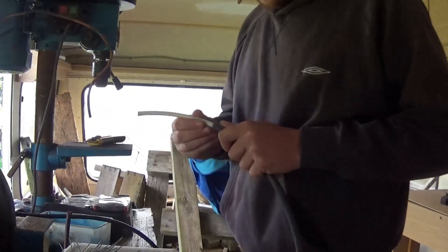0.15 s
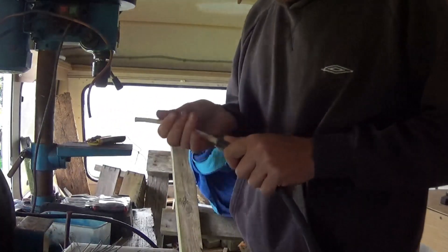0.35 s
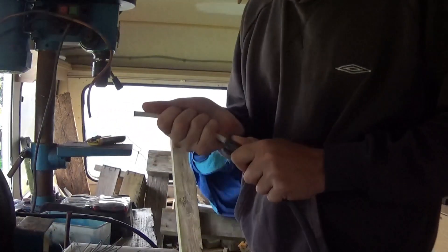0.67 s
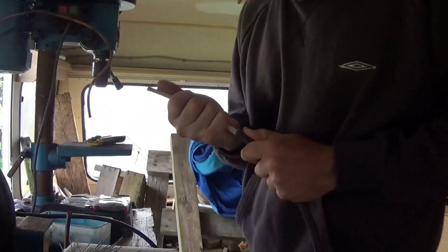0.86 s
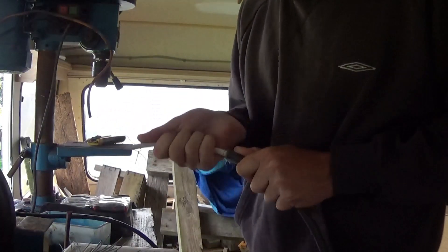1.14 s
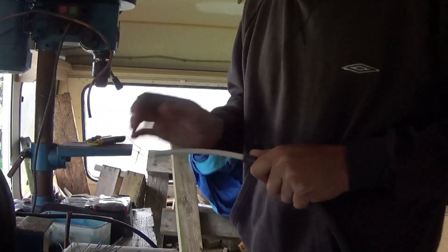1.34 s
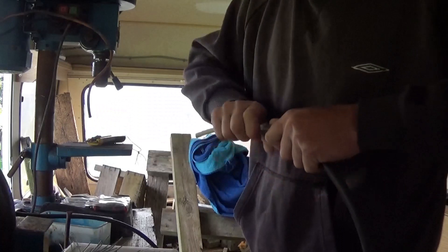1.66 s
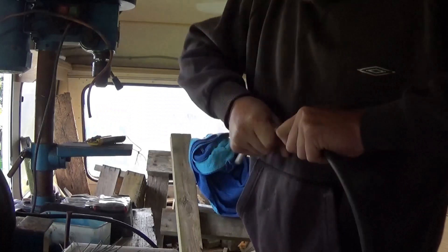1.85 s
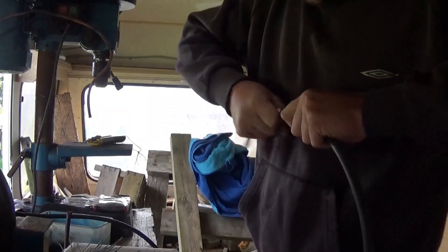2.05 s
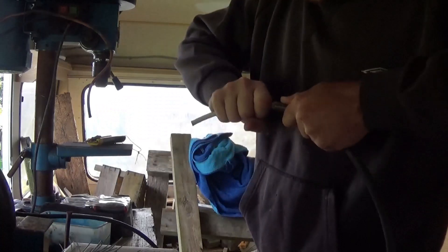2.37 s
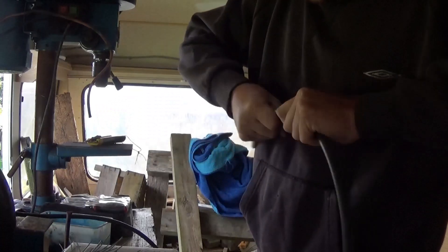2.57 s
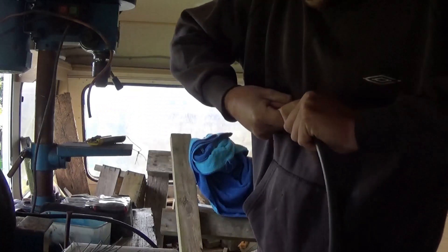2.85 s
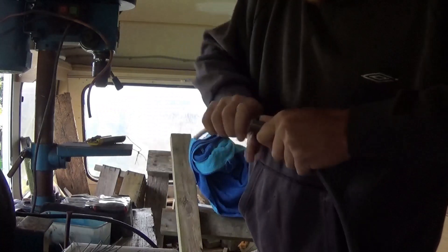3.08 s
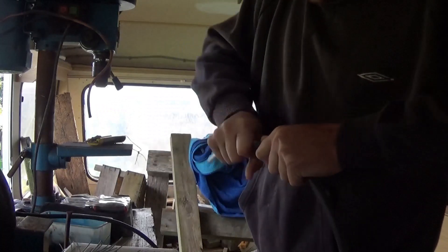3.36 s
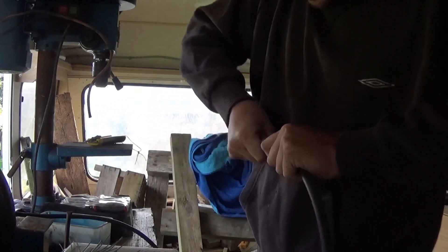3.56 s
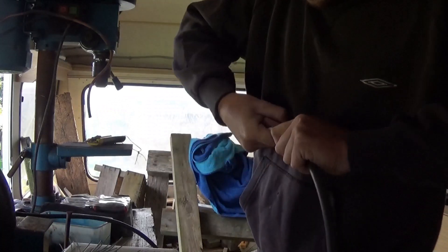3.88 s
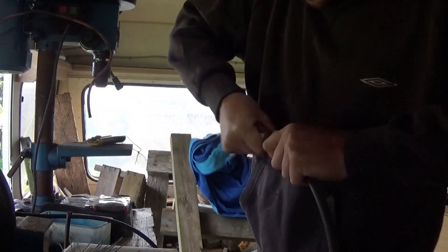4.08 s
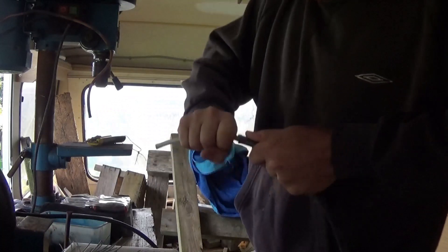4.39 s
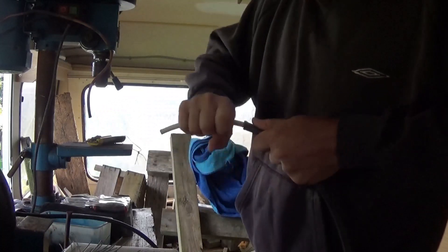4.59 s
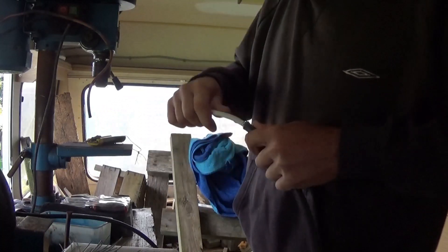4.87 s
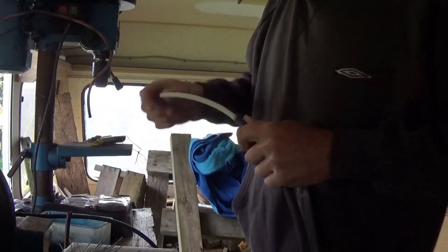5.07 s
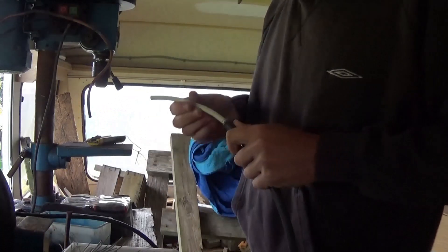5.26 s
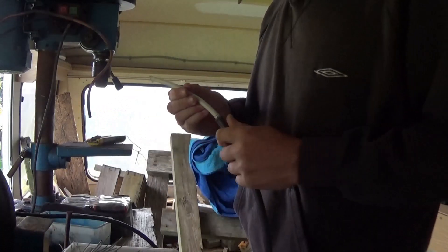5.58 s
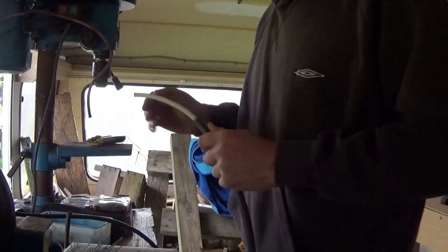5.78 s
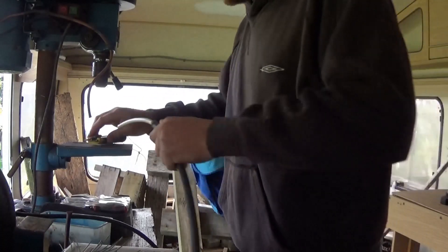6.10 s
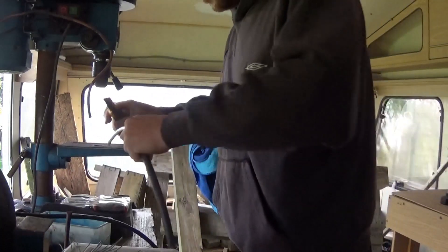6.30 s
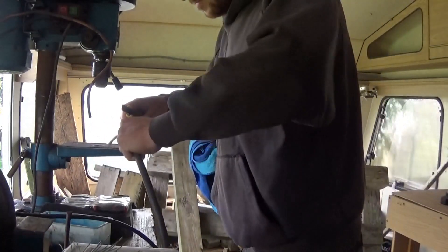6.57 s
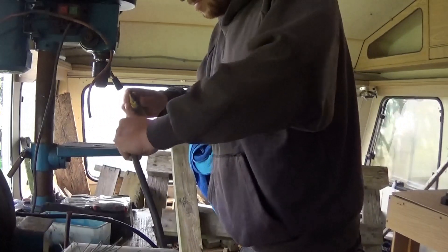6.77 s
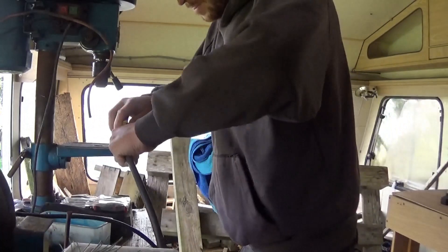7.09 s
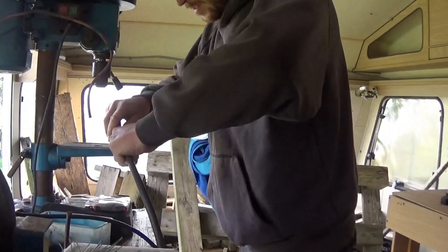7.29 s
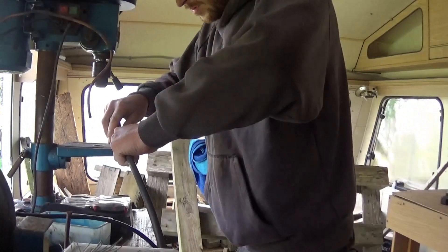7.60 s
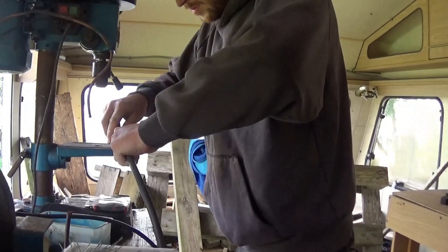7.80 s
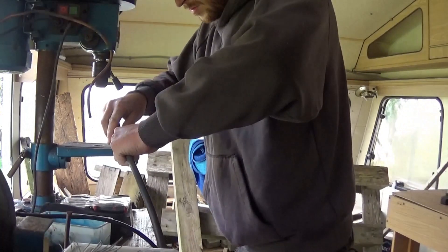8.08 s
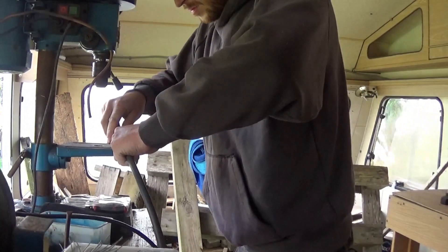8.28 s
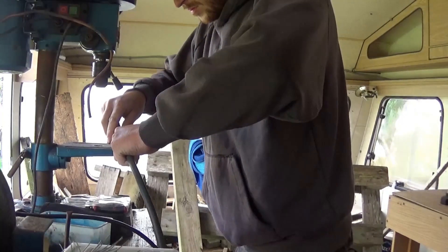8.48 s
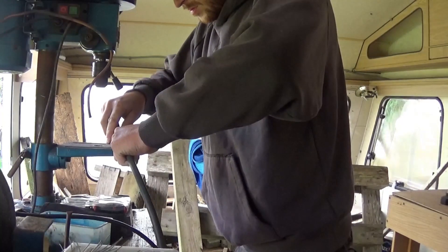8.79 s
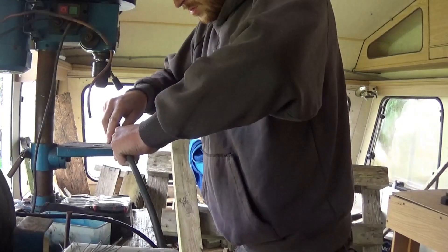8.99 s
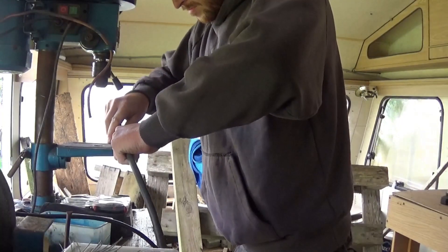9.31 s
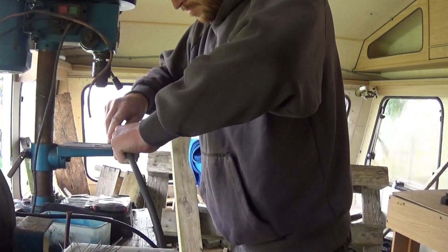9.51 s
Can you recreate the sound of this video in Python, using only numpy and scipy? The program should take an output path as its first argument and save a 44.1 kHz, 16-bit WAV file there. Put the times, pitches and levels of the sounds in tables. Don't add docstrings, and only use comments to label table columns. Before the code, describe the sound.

Hands strip a stiff cable in a small workshop: rapid creak, thumps on wood, plastic snaps, clattering steel taps, then quiet ticks and one sharp snip.

```python
import sys
import numpy as np
from scipy import signal
from scipy.fft import rfft, irfft, next_fast_len
from scipy.io import wavfile
from scipy.ndimage import map_coordinates

SR = 44100
rng = np.random.default_rng(int(sys.argv[2]) if len(sys.argv) > 2 else 0)


def store_wav(level_fs):
    pcm = np.round(np.clip(np.atleast_2d(level_fs), -1, 1) * 32767)
    wavfile.write(sys.argv[1], SR, pcm.T.astype(np.int16))


def convert_level_to_amplitude(level_db):
    exponent = np.asarray(level_db, float) / 20
    return 10 ** exponent


N = 425565
TOP_HZ = 10980

# (time [s], level [dB])
SLIPS = [(0.0614, -14), (0.069, -25), (0.0763, -24), (0.0856, -22), (0.0889, -38), (0.0925, -28),
         (0.0969, -27), (0.103, -23), (0.111, -21.5), (0.1187, -25.5), (0.127, -26), (0.1361, -19.5),
         (0.148, -19.5), (0.168, -18), (0.196, -17), (0.228, -17.5), (0.2712, -18.5), (0.3153, -18),
         (0.3768, -19), (0.4675, -21)]
# (time [s], level [dB], hardness corner [Hz], hollowness [dB], weight on the floor [dB])
KNOCKS = [(1.966, -47, 595, -7, -54), (2.046, -31, 550, 0, -36), (2.637, -43, 840, 9, -50),
          (2.765, -24, 500, 11, -30), (3.017, -12.5, 1480, -0.5, -28), (3.499, -33.5, 740, 2, -37),
          (4.144, -19, 724, 1.5, -32), (4.729, -23.5, 890, -2.5, -22.5), (4.392, -46, 900, -3, -60),
          (4.495, -55, 1200, -7, -60), (6.157, -34.5, 544, 25, -34), (6.193, -16.5, 680, -4, -23.5),
          (6.447, -25.5, 900, 5, -29), (6.583, -41, 1050, -4, -40), (7.041, -35, 700, 7, -24),
          (7.086, -33.5, 950, 8, -24), (9.207, -52.5, 300, -8, -44)]
# (frequency [Hz], likeness [0..1])
CABIN_ALIKE = [(200, 1), (600, 0.95), (2000, 0.67), (10000, 0.84)]


def unit(x):
    return x / np.sqrt(np.mean(x ** 2) + 1e-20)


def along(points, hz):
    f, v = np.transpose(points)
    return np.interp(np.log(hz + 1), np.log(f + 1), v)


def curves(rows, off=-110):
    s, *cols = np.transpose(rows)
    return [np.interp(np.arange(N) / SR, s, c, off, off) for c in cols]


def wobble(rate_hz):
    knots = rng.standard_normal(int(N * rate_hz / SR) + 4)
    return map_coordinates(knots, [np.arange(N) * rate_hz / SR])


def filtered(x, response):
    m = next_fast_len(x.shape[-1] + 4096)
    return irfft(rfft(x, m) * response(np.fft.rfftfreq(m, 1 / SR)), m)[..., :x.shape[-1]]


def modes(table):
    def response(f):
        total = 0
        for k, (hz, width_hz, db) in enumerate(table):
            loss = 1j * f * width_hz
            total = total + (-1) ** k * convert_level_to_amplitude(db) * loss / (hz * hz - f * f + loss)
        return total
    return response


def causal(table):
    def response(f):
        power = sum(np.abs(modes([mode])(f)) ** 2 for mode in table)
        cepstrum = irfft(np.log(power + 1e-9) / 2)
        half = len(cepstrum) // 2
        fold = np.r_[1, 2 * np.ones(half - 1), np.zeros(len(cepstrum) - half)]
        return np.exp(rfft(cepstrum * fold, 2 * len(f) - 1)[:len(f)])
    return response


def spread(pair, alike):
    def mid_side(hz):
        turn = np.arccos(np.clip(along(alike, hz), -1, 1)) / 2
        return np.array([np.cos(turn), np.sin(turn)])
    mid, side = filtered(pair, mid_side)
    return np.array([mid + side, mid - side])


def cabin(stretch, walls=0.79):
    # (frequency [Hz], t60 [s])
    decay = [(200, 0.35), (700, 0.21), (2000, 0.17), (5000, 0.15), (10000, 0.17)]
    hz, t, z = signal.stft(rng.standard_normal((2, SR // 6)), SR, nperseg=128)
    turn = np.arccos(np.clip(along(CABIN_ALIKE, hz), -1, 1))[:, None] / 2
    fade = convert_level_to_amplitude(-60 * t / stretch / along(decay, hz)[:, None]) * (1 + walls * np.exp(-t / 0.0024))
    mid, side = z * fade * [np.cos(turn), np.sin(turn)]
    tail = signal.istft(np.array([mid + side, mid - side]), SR, nperseg=128)[1]
    return np.pad(tail / np.linalg.norm(tail[0]), ((0, 0), (50, 0)))


def add(out, s, peak_db, sound, wet_db, tail, pan_db=0.0):
    both = convert_level_to_amplitude(wet_db) * signal.fftconvolve(sound[None], tail, axes=1)
    both[:, :len(sound)] += sound
    piece = out[:, round(s * SR):][:, :both.shape[1]]
    gain = convert_level_to_amplitude(peak_db + pan_db / 2 * np.array([[1], [-1]]))
    piece += gain * both[:, :piece.shape[1]] / np.abs(sound).max()


def burst(contact_s, response, lead, hold=1, rise_s=1e-5):
    t = np.arange(3000) / SR
    rattle = rng.standard_normal(len(t)) * (1 - np.exp(-(t / rise_s) ** 2))
    return filtered((rattle + lead * (t == 0)) * convert_level_to_amplitude(-40 * (t / contact_s) ** hold), response)


def creak(out):
    # (frequency [Hz], width [Hz], level [dB])
    shell_modes = [(335, 350, -3), (620, 170, -1), (1126, 150, 2.5), (1887, 120, -0.5), (2240, 250, -1),
                   (2590, 250, 0), (3040, 270, 4), (3220, 120, 1), (3870, 650, -13.5), (5800, 570, -5.5),
                   (7300, 800, -22.5), (8500, 670, -6.5), (9550, 400, -13.5), (10760, 520, -18)]
    board_modes = [(354, 380, -5), (887, 13, 12), (1050, 34, 11)]
    # (frequency [Hz], width [Hz], level of the part taken away [dB]
    weak_bands = [(1590, 330, -26), (4750, 700, -1)]
    near_wall_s, near_wall_db = 0.0031, -14
    smear_s = 0.00121
    start_db, rest_db, fade_s = 0.5, -18.5, 0.08
    new_share = 0.51

    def radiation(f):
        dips = np.prod([1 - modes([dip])(f) for dip in weak_bands], axis=0)
        return dips * 1j * f / (200 + 1j * f) * np.exp(-1j * np.pi * f * f * smear_s / TOP_HZ)

    tail = cabin(1.55, walls=0.47)
    jolt = 1.0 * (np.arange(3000) == 0)
    click = convert_level_to_amplitude(8) * filtered(jolt, causal(shell_modes))
    click = click + convert_level_to_amplitude(near_wall_db) * np.roll(click, round(near_wall_s * SR))
    click = filtered(click, radiation)
    thump = filtered(jolt, modes(board_modes))
    for s, db in SLIPS:
        thump_db = rest_db + (start_db - rest_db) * np.exp(-((s - SLIPS[0][0]) / fade_s) ** 2)
        answer = (1 - new_share) * tail + new_share * cabin(1.12, walls=0.59)
        add(out, s + 0.00044, db + 0.06, click + convert_level_to_amplitude(thump_db + 12) * thump, 6.0, answer, pan_db=-1.7)


def knocks(out):
    # (frequency [Hz], level [dB], t60 [s])
    bench = [(225.3, -13.5, 0.16), (271, -8.5, 0.094), (353, 1, 0.082), (418, -6.5, 0.11),
             (546, -5.5, 0.09), (640, -0.5, 0.063), (718, 3, 0.052), (788, 2.5, 0.065), (840, 6, 0.022),
             (1036, -26, 0.074), (1071, -2, 0.07), (1200, 2, 0.067), (1260, -18, 0.2), (1633, -9, 0.15)]
    rise_s = 0.0031
    t = np.arange(SR // 6) / SR
    hz, level_db, t60 = np.transpose(bench)[:, :, None]
    for s, db, corner_hz, hollow_db, _ in KNOCKS:
        chance = rng.standard_normal((2, len(bench), 1))
        gain = convert_level_to_amplitude(level_db + hollow_db * (hz < 450) + 1.5 * chance[0])
        gain = gain / (1 + (hz / corner_hz) ** 2) ** 1.53
        tones = np.sin(2 * np.pi * hz * t + 3 * chance[1])
        ring = (gain * convert_level_to_amplitude(-60 * (t / t60) ** 1.24) * tones).sum(0)
        ring = unit(ring * (1 - np.exp(-t / rise_s)))
        dull = lambda f: modes([(900, 2400, 0)])(f) / (1 + 1j * f / (1.4 * corner_hz)) ** 3
        edge = burst(0.059, dull, lead=3.9, hold=0.79)
        ring[:len(edge)] += unit(edge * (1 - np.exp(-t[:len(edge)] / rise_s)))
        add(out, s, db - 1, ring, -3.5, cabin(0.77))


def snaps(out):
    # (time [s], level [dB])
    cracks = [(1.923, -34.5), (2.034, -25.5), (2.05, -21), (2.345, -30), (2.7062, -29), (2.763, -30),
              (2.924, -28.5), (3.919, -28.5), (4.497, -33), (4.573, -26), (5.456, -29), (5.657, -33),
              (6.177, -31), (6.302, -25), (6.31, -23)]
    # (time [s], level [dB], centre [Hz])
    ticks = [(0.8485, -35, 4800), (0.875, -37, 4940), (0.9539, -34, 7300), (1.5725, -31, 5760),
             (1.6458, -34.5, 7260), (2.247, -39.5, 3720), (3.3843, -39, 8700), (3.4531, -25.5, 7100),
             (3.5163, -23, 9950), (4.358, -34, 4730), (4.3916, -32, 4750), (6.192, -27, 10000),
             (6.5861, -32, 7660), (7.5702, -45, 3400), (7.7553, -55, 3760)]
    # (time [s], level [dB], centre [Hz])
    flicks = [(1.1932, -38.5, 2590), (2.2262, -45, 4500), (2.2995, -33, 3000), (2.3028, -37, 4800),
              (2.309, -40, 5000), (2.3378, -35.5, 4600), (2.6052, -41, 3398), (2.762, -42, 2200),
              (2.8, -44, 2390), (3.678, -47, 5000), (3.6833, -37, 3200), (3.807, -43, 8000),
              (5.9, -48, 2000), (5.5, -45, 3670), (4.4641, -39, 3220), (5.808, -41, 6955),
              (6.296, -37, 3000), (6.448, -30, 5940), (6.837, -40, 2268), (7.0792, -29, 5454),
              (7.0837, -33.5, 1500), (7.224, -40, 1200), (7.4574, -38, 3640)]
    # (time [s], level [dB], centre [Hz], body [dB])
    breaks = [
        (3.5292, -7.5, 8700, -11),
    ]
    # (time [s], level [dB])
    ratchet = [(6.332, -31), (6.3546, -24), (6.3815, -25), (6.4, -30), (6.407, -28), (6.422, -29),
               (6.4305, -23), (6.448, -28), (6.4644, -25.5), (6.4776, -32), (6.49, -29), (6.5014, -31),
               (6.6138, -25), (6.63, -28), (6.6494, -30), (6.661, -32), (6.6773, -35), (6.6886, -35),
               (6.6992, -37)]
    events = [(s, db, 9550, -7.5) for s, db in cracks]
    events += [(*row, -55) for row in ticks]
    events += [(*row, -16) for row in flicks]
    events += breaks
    events += [(s, db, 8650, -10) for s, db in ratchet]
    tails = [cabin(0.9, walls=1.5) for _ in range(12)]
    for k, (s, db, hz, body_db) in enumerate(events):
        body = modes([(2200, 2400, body_db + 4.0), (hz, 0.5 * hz, 0)])
        crack = burst(0.0016, body, lead=2.1, rise_s=0.00047)
        add(out, s + 0.0005, db + 3.0, crack, 2.5, tails[k % len(tails)])


def blade(out):
    # (time [s], level [dB], lowest ring [Hz], its level [dB], brightness [dB])
    cuts = [(6.311, -30, 1400, -25, -6), (6.396, -35.5, 1850, -32, -8.5), (6.538, -46, 1670, -28, -32),
            (6.5456, -38, 1680, -22, -37), (6.8115, -47, 1370, -25, -37), (7.2162, -45, 1360, 15, -27),
            (7.774, -58, 1800, -18, -27), (7.787, -47, 1790, -7, -17), (7.8675, -56.5, 1750, -12, -25),
            (7.938, -60, 1800, -15, -35), (8.739, -46, 1810, -24, -21), (8.743, -42.5, 1810, -6, -26),
            (9.19, -55, 1590, -1, -21)]
    # (frequency [Hz], width [Hz], level [dB])
    blade_modes = [(2870, 290, 2), (3930, 380, -13), (5840, 140, 17.5), (7400, 300, 9), (8740, 510, 4),
                   (9500, 350, 5)]
    bite_modes = [(1500, 370, 8.5), (1810, 96, 5), (2800, 300, 11), (3700, 520, -6), (4600, 690, -21),
                  (6350, 450, -2), (7130, 270, 15.5), (7650, 300, -4), (8700, 1000, -15), (9800, 900, -17)]
    # (frequency [Hz], width [Hz], level of the part taken away [dB]
    mute_band = [(2220, 420, 1)]

    def steel(table, bass_cut_hz):
        def response(f):
            bass_cut = (1j * f / (bass_cut_hz + 1j * f)) ** 4
            return causal(table)(f) * (1 - modes(mute_band)(f)) * bass_cut
        return response

    for s, db, ring_hz, ring_db, bright_db in cuts:
        body = [(ring_hz, 200, ring_db + 14.5)]
        body += [(hz, width, level + (hz > 5000) * (bright_db - 5.5)) for hz, width, level in blade_modes]
        tick = burst(0.005, steel(body, 1100), lead=1.6, hold=1.3, rise_s=0.00089)
        add(out, s, db + 10.0, tick, 2.7, cabin(0.9))
    bite = burst(0.0066, steel(bite_modes, 900), lead=0.11, hold=1.4, rise_s=0.002)
    add(out, 8.3535, -19, bite, 5.5, cabin(0.81))


def vice(out):
    # (time [s], level [dB], tilt [dB per octave], share of the free ring time)
    taps = [(6.0517, -46, 11, 1.5), (6.1073, -39.5, 15, 0.77), (6.31, -47, -1.5, .4),
            (6.3506, -29, -9, 0.34), (6.381, -35, 12, .6), (6.4083, -27.5, 2, 0.97),
            (6.4463, -29.5, -5, 0.79), (6.614, -31, 5, 0.53), (6.65, -41, 7, 0.42), (6.6789, -35, 3.5, 1.1),
            (6.838, -25.5, 0, 0.76), (6.9285, -39.5, 0, 0.71), (7.042, -31.5, -10, 0.17),
            (7.035, -41, 17, 0.72)]
    # (frequency [Hz], level [dB], t60 [s])
    steel_modes = [(1036, 8, 0.39), (1394, 4, 0.46), (2065, -3, 0.31), (2280, -10, 0.28), (2590, -20, 0.16),
                   (3760, -11.5, 0.45), (4980, -10, 0.3), (5190, -13, 0.26), (6090, -15, 0.23),
                   (8200, -16, 0.13)]
    t = np.arange(SR // 4) / SR
    for s, db, tilt_db, free in taps:
        drift = 0.036 * np.cumsum(rng.standard_normal(len(t)))
        ring = np.zeros(len(t))
        for hz, mode_db, t60 in steel_modes:
            level_db = mode_db + tilt_db * np.log2(hz / 1200) + rng.normal(0, 1.2)
            ring += convert_level_to_amplitude(level_db - 60 * t / (free * t60)) * np.sin(2 * np.pi * hz * t + drift)
        ring = ring * (1 - np.exp(-t / 0.00086)) / np.abs(ring).max()
        clank = burst(0.026, modes([(1200, 420, 0)]), lead=1.0)
        ring[:len(clank)] += convert_level_to_amplitude(-5 - abs(tilt_db)) * clank / np.abs(clank).max()
        add(out, s, db - 3.0, ring, -9.5, cabin(0.47))


def grains(rate_hz, size_db):
    size, count = 2048, N // 2048 + 1
    hits = rng.random((count, size)) < rate_hz / SR
    size_gain = convert_level_to_amplitude(size_db * np.minimum(rng.exponential(size=(count, size)), 3.5))
    hits = hits * size_gain * rng.standard_normal((count, size))
    echo = rng.standard_normal((2, count, 2000)) * convert_level_to_amplitude(-60 * np.arange(2000) / SR / 0.069)
    parts = irfft(rfft(hits, 2 * size) * rfft(echo, 2 * size), 2 * size)
    both = parts[..., :size] + np.roll(parts[..., size:], 1, axis=1)
    return spread(both.reshape(2, -1)[:, :N], CABIN_ALIKE)


def strokes(rows, between_db):
    rise_db, fall_db, roundness = 12.5, 11, 1.42
    power = convert_level_to_amplitude(2 * between_db)
    for s, length_s, db in rows:
        n = np.arange(round((s - 0.3) * SR), round((s + 0.4) * SR))
        late = (n / SR - s) / max(length_s, 0.01)
        loss_db = np.where(late < 0, rise_db, fall_db) * np.abs(late) ** roundness
        power[n] += convert_level_to_amplitude(2 * (db - loss_db))
    return np.sqrt(power)


def rubbing():
    # (time [s], length [s], level [dB])
    drags = [(1.98, 0.023, -43), (2.06, 0.082, -35), (2.545, 0.11, -42.5), (2.66, 0.035, -37.5),
             (2.77, 0.061, -26.5), (2.865, 0.041, -31.5), (2.938, 0.024, -39.5), (3.11, 0.14, -51),
             (3.225, 0.037, -48), (4.3, 0.21, -60.5), (4.59, 0.031, -48), (6.15, 0.17, -54.5),
             (6.265, 0.045, -53), (6.346, 0.023, -52), (6.45, 0.13, -41), (6.605, 0.028, -41),
             (6.72, 0.068, -43), (6.87, 0.042, -44), (7.054, 0.036, -43.5), (7.23, 0.066, -58)]
    # (time [s], length [s], plastic [dB], sleeve [dB])
    tugs = [(0.537, 0.09, -62, -56), (0.766, 0.025, -61, -51), (0.852, 0.019, -55, -52),
            (1.247, 0.059, -81, -48.5), (1.508, 0.018, -73, -57.5), (1.963, 0.05, -50.5, -51),
            (2.056, 0.049, -49, -46), (2.515, 0.075, -50, -55), (2.696, 0.082, -45.5, -53),
            (2.817, 0.1, -41, -48.5), (2.87, 0.042, -45, -58), (3.041, 0.08, -52, -55),
            (3.172, 0.17, -57, -58.5), (3.422, 0.05, -56, -64), (4.36, 0.07, -56.5, -69),
            (4.51, 0.03, -48, -69), (4.586, 0.1, -77, -53.5), (4.718, 0.079, -73, -52.5),
            (5.082, 0.033, -56, -47.5), (5.505, 0.045, -57, -56), (5.668, 0.058, -60, -54.5),
            (5.823, 0.023, -55, -49.5), (6.114, 0.057, -54, -51), (6.236, 0.1, -44.5, -53),
            (6.33, 0.042, -39, -64), (6.42, 0.073, -34, -47), (6.51, 0.094, -42, -60),
            (6.655, 0.077, -36, -39), (6.88, 0.11, -49.5, -84), (7.098, 0.05, -37.5, -53),
            (7.22, 0.07, -49, -61)]
    # (time [s], level [dB])
    fidget = [(0.5, -60), (1.0, -73), (1.9, -89), (2.3, -65), (3.0, -76), (3.3, -69), (4.1, -68.5),
              (4.4, -60.5), (5.1, -60), (5.8, -70), (6.05, -60.5), (6.4, -94), (6.98, -49.5), (7.2, -59),
              (7.46, -57.5), (7.6, -72)]
    # (frequency [Hz], width [Hz], level [dB])
    wood_modes = [(235, 48, -5), (342, 55, -10), (415, 25, -12.5), (578, 72, -16), (840, 21, -19.5),
                  (1103, 104, -27.5), (1850, 76, -38), (2360, 63, -30), (2940, 40, -31.5)]
    # (frequency [Hz], density [dB per Hz])
    plastic_spectrum = [(410, -8.5), (700, -4.5), (1070, -2.5), (1310, -5), (1420, -5.5), (2060, -6),
                        (6000, -16.5), (7800, -25), (13200, -120)]
    sleeve_spectrum = [(2500, -4.5), (4000, -1.5), (5000, -3), (7000, 0.5), (9000, 4.5), (11500, -3)]
    busy_db, = curves(fidget)
    drag = unit(filtered(grains(1500, 1.0), modes(wood_modes)))
    scrape = unit(filtered(grains(2000, 4.0), lambda f: convert_level_to_amplitude(along(plastic_spectrum, f))))
    swish = unit(filtered(grains(4000, 2.08), lambda f: convert_level_to_amplitude(along(sleeve_spectrum, f))))
    plastic = [(s, length_s, db) for s, length_s, db, _ in tugs]
    sleeve = [(s, length_s, db) for s, length_s, _, db in tugs]
    return (strokes(drags, busy_db - 7.5) * drag
            + convert_level_to_amplitude(-2.5) * strokes(plastic, busy_db) * scrape
            + convert_level_to_amplitude(3.0) * strokes(sleeve, busy_db - 1.5) * swish)


def floor():
    # (frequency [Hz], width [Hz], level [dB])
    floorboards = [(100, 47, -10), (162, 65, 4)]
    t = np.arange(SR // 8) / SR
    push = np.zeros((2, N + SR))
    tear_weight_db = -43
    for s, weight_db in [(SLIPS[0][0], tear_weight_db)] + [(row[0], row[-1]) for row in KNOCKS]:
        shove = rng.standard_normal(len(t)) + 0.14 * rng.standard_normal((2, len(t)))
        push[:, round(s * SR):][:, :len(t)] += convert_level_to_amplitude(weight_db - 60 * t / 0.32) * shove
    return filtered(push[:, :N], lambda f: modes(floorboards)(f) / (1 + 1j * f / 200) ** 2)


def bird(out):
    # (time [s], level [dB])
    calls = [(0.54, -40), (0.714, -40.5), (0.914, -43), (1.578, -45), (2.446, -43), (3.257, -37.5),
             (3.457, -41), (3.704, -40), (3.7874, -44.5), (3.952, -42.5), (4.1974, -43), (4.533, -42),
             (4.9904, -42.5), (5.432, -43.5), (5.8674, -41), (6.8763, -40.5), (7.184, -40), (7.5897, -40.5),
             (7.898, -40.5), (8.146, -41), (8.4864, -44.5), (8.7052, -44.5), (8.7864, -43.5), (8.967, -42),
             (9.129, -41.5), (9.396, -44)]
    # (time [s], pitch [Hz], warble [Hz], level [dB])
    course = [
        (0, 6180, 870, 7.5),
        (.012, 6560, 710, -1.5),
        (.024, 6967, 250, 3.5),
        (.042, 6880, 248, -15),
    ]
    s, hz, warble_hz, db = np.transpose(course)
    t = np.arange(round(s[-1] * SR)) / SR
    edges = np.minimum(1, np.minimum(t, t[::-1]) / 0.0074)
    tails = [cabin(1.15) for _ in range(7)]
    for k, (start_s, level_db) in enumerate(calls):
        centre = np.interp(t, s, hz) * (1 + 0.0086 * rng.standard_normal())
        pitch = centre - np.interp(t, s, warble_hz) * np.cos(2 * np.pi * 150 * t)
        chip = convert_level_to_amplitude(np.interp(t, s, db)) * np.sin(2 * np.pi * np.cumsum(pitch) / SR) * edges
        add(out, start_s - 0.003, level_db - 13.0, chip, 8.0, tails[k % len(tails)], pan_db=1.0)


def hoot():
    # (time [s], pitch [Hz], level [dB])
    calls = [
        [(1.0, 513, -93), (1.1, 512, -71), (1.2, 517, -69), (1.3, 520, -94)],
        [(1.68, 522, -80), (1.76, 519, -62.5), (1.95, 516, -63.5), (2.0, 521, -82)],
    ]
    return sum(convert_level_to_amplitude(db + 3.0) * np.sin(2 * np.pi * np.cumsum(hz) / SR) for hz, db in map(curves, calls))


def engine():
    # (time [s], firing [dB], second order [dB])
    levels = [(7.2, -86, -90), (7.7, -80, -72), (8.2, -74.5, -79), (8.7, -67.5, -67), (9.2, -76, -71.5),
              (9.65, -72, -85)]
    first_db, second_db = curves(levels)
    turn = 2 * np.pi * np.cumsum(82 + 0.874 * wobble(1.9)) / SR
    first = convert_level_to_amplitude(first_db + 1.4 * wobble(8.5)) * np.sin(turn)
    second = convert_level_to_amplitude(second_db - 6.0 + 2.1 * wobble(8.5)) * np.sin(2 * turn)
    return first + second


def far_tones():
    # (frequency [Hz], level [dB])
    lines = [(690, -74), (790, -78), (7850, -86)]
    t = np.arange(N) / SR
    return sum(convert_level_to_amplitude(db + 4.04 * wobble(2.687)) * np.sin(2 * np.pi * hz * t + 2.0 * wobble(12))
               for hz, db in lines)


def traffic():
    # (time [s], deep [dB], drone [dB])
    levels = [(0.0, -65, -89), (2.42, -102, -69.5), (2.77, -70, -57), (3.44, -78, -82), (6.77, -83, -63.5),
              (9.65, -79, -92)]
    deep_db, drone_db = curves(levels)
    deep = unit(filtered(rng.standard_normal(N), modes([(83, 13, 0)])))
    drone = unit(filtered(rng.standard_normal(N), modes([(137, 49, 0)])))
    return convert_level_to_amplitude(deep_db - 4.0) * deep + convert_level_to_amplitude(drone_db - 6.5) * drone


def air():
    # (frequency [Hz], density [dB per Hz])
    spectrum = [(20, -30), (50, -38), (80, -27), (140, -14.5), (200, -11), (330, -6.5), (650, -5),
                (900, -6), (1900, -8.5), (3500, -7.5), (5000, -13), (8000, -11.5), (11500, -17.5)]
    # (time [s], level [dB])
    levels = [(0, -58), (4.5, -60), (5.5, -57.5), (7.5, -59.5), (9.65, -60)]
    # (frequency [Hz], likeness [0..1])
    alike = [(60, 0.28), (170, 0.9), (480, 0.66), (1370, 0.41), (3880, 0.43), (11000, 0.84)]
    noise = spread(rng.standard_normal((2, N)), alike)
    noise = unit(filtered(noise, lambda f: convert_level_to_amplitude(along(spectrum, f))))
    return convert_level_to_amplitude(curves(levels)[0] - 0.22 + 0.69 * wobble(6.2)) * noise


def scene():
    near = rubbing()
    for source in (creak, knocks, snaps, blade, vice, bird):
        source(near)
    near = filtered(near, lambda f: (1j * f / (170 + 1j * f)) ** 4)
    return near + floor() + hoot() + engine() + far_tones() + traffic() + air()


def band_limit(x):
    return signal.sosfilt(signal.butter(12, 11610, fs=SR, output="sos"), x)


def record(dry):
    mix = filtered(dry, lambda f: 1 / (1 + (f / TOP_HZ) ** 120) + convert_level_to_amplitude(-41))
    return band_limit(mix)


dry = scene()
out = record(dry)
store_wav(out)
```